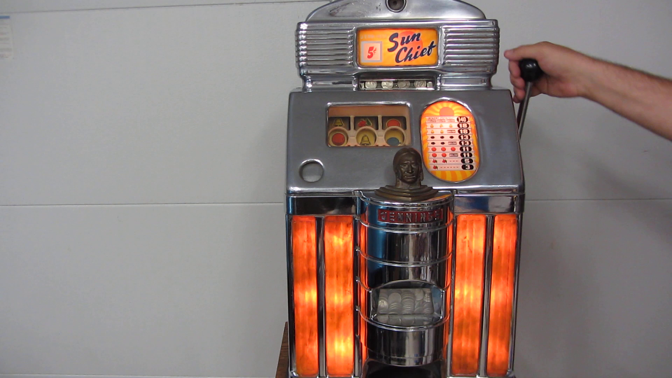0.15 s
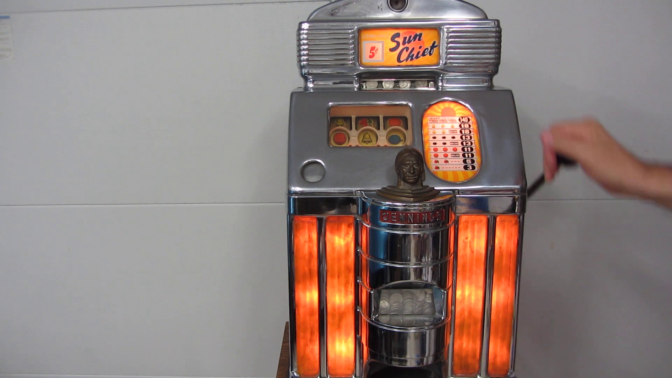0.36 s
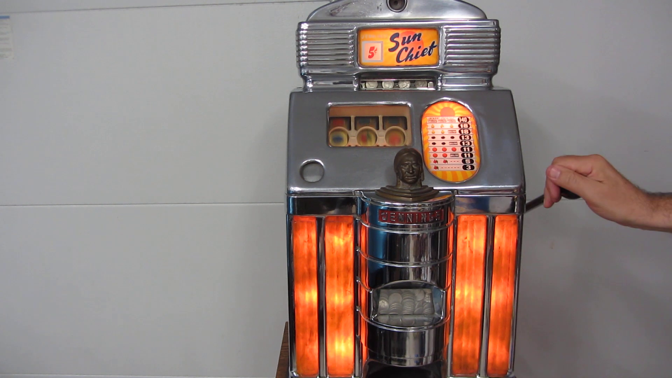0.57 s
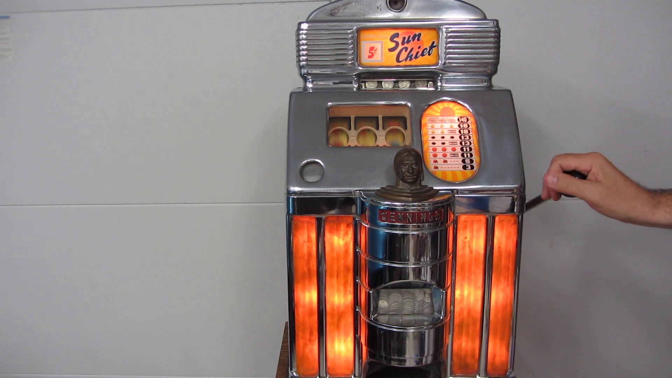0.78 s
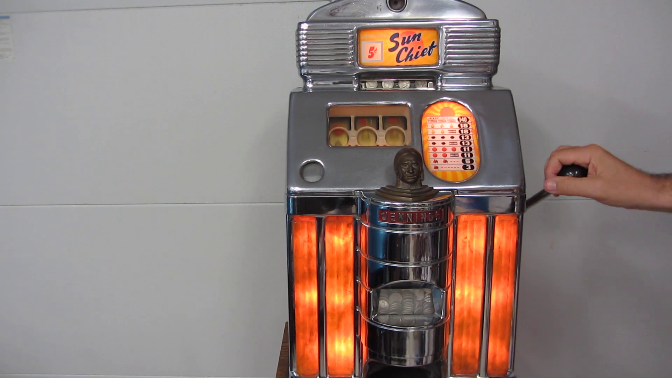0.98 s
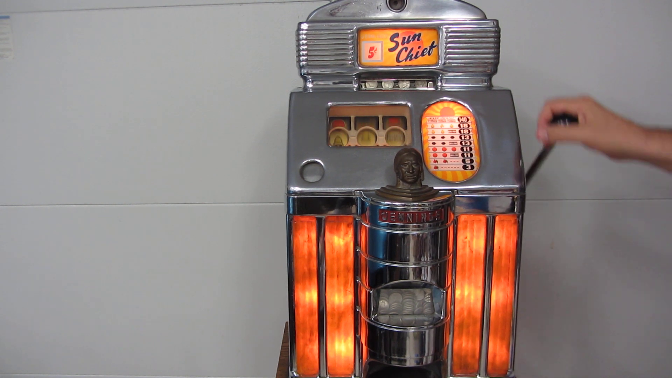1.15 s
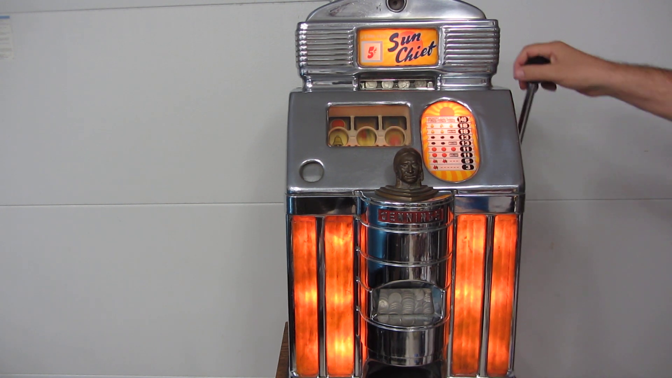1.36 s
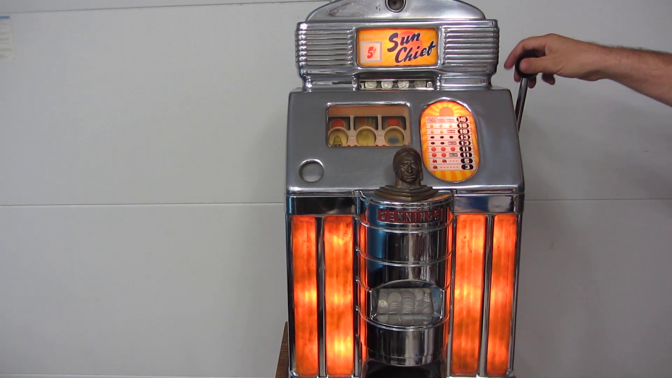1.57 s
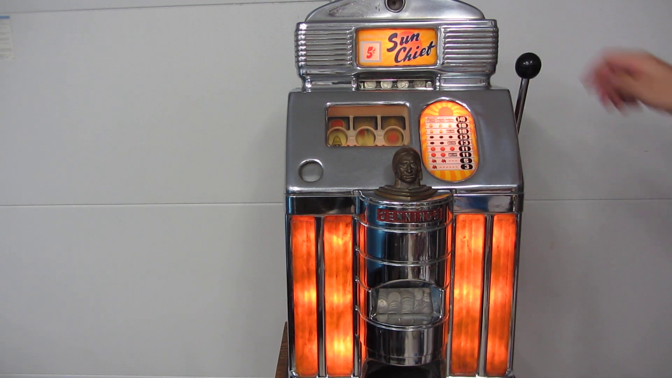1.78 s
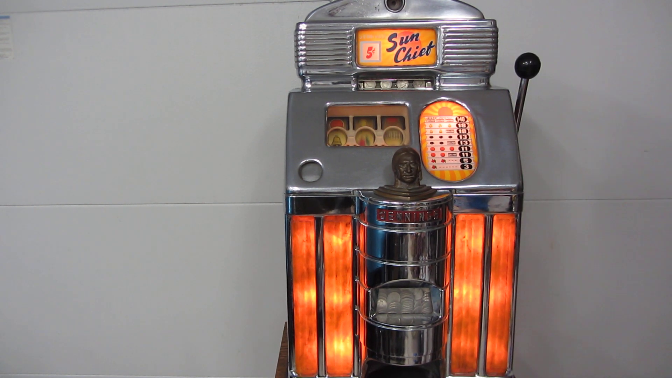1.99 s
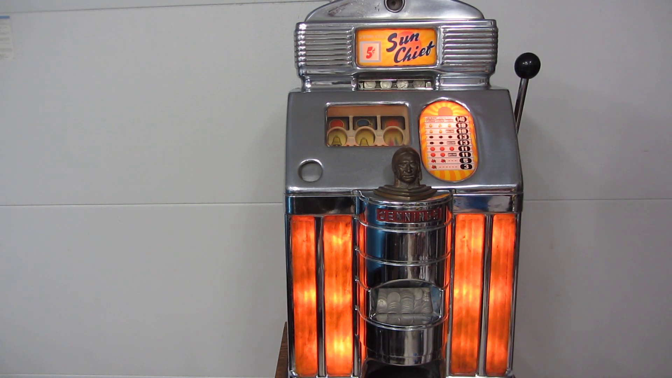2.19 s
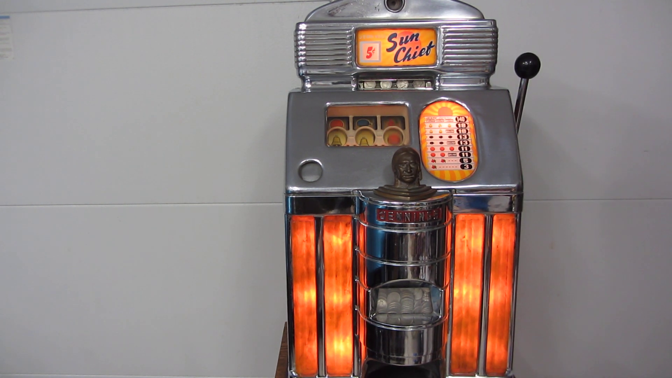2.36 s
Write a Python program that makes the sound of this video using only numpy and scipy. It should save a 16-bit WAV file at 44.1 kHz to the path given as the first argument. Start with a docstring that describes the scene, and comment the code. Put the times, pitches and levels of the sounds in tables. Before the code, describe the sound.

Close up in a small quiet room, a slot machine lever crashes down with rattling linkage and low booms, eases back with lighter clunks and ticks, and ends in crisp clicks over faint hum.

```python
"""Small room, close by: the handle of a mechanical slot machine is pulled down and let back up.
The linkage clatters and the ratchet ticks: dying noise bursts that drive cabinet panel resonances.
Levers, teeth, catches, a pawl, a spring and a zing ring as clusters of beating partials.
Low sine thumps boom in the cabinet; a diffuse tail, room noise and a faint mains hum lie around it."""
import sys
import numpy as np
from scipy import signal
from scipy.io import wavfile

SR = 44100
rng = np.random.default_rng(int(sys.argv[2]) if len(sys.argv) > 2 else 0)


def unload_audio(sound):
    """Save the sound as a 16-bit wav file, at the path given as the first command line argument."""
    columns = np.transpose(np.atleast_2d(sound))
    # keep every value between -1 and 1, then stretch to whole-number steps
    steps = np.round(np.clip(columns, -1, 1) * 32767)
    wavfile.write(sys.argv[1], SR, steps.astype(np.int16))


N = 110250
TIME_S = np.arange(N) / SR
EDGES_HZ = 31.25 * 2 ** np.arange(0, 9.1, .5)  # half-octave bands
CENTRES_HZ = np.sqrt(EDGES_HZ[1:] * EDGES_HZ[:-1])
EARS = np.array([[1], [-1]])  # left, right

# room noise: band_hz, level_db (per half-octave band)
FLOOR = [(40, -80), (80, -62.5), (140, -54), (220, -63.5), (1200, -64), (2200, -61.5), (3300, -72.5),
         (7000, -72), (10000, -86), (14000, -88)]
# stereo likeness: band_hz, left_right_correlation (clipped in use)
LIKENESS = [(40, -2.1), (130, 0.99), (4000, 0.66), (8000, 0.45), (13000, -0.57)]
# linkage blows: start_s, low_db, mid_db, high_db, top_db, t60_s
BLOWS = [(0.154, -45, -43, -48.5, -76, 0.24), (0.202, -20, -24, -28, -32, 0.37),
         (0.251, -26, -27.5, -28.5, -20, 0.46), (0.2695, -14, -17.5, -17.5, -43, 0.31),
         (0.289, -17, -19.5, -18, -16, 0.17), (0.314, -37, -28, -23.5, -18, 0.59),
         (0.359, -18, -20.5, -12.5, -19.5, 0.11), (0.396, -21.5, -23, -23, -20, 0.51),
         (0.439, -18, -13.5, -19, -36, 0.13), (0.4693, -18, -17.5, -17, -12.5, 0.12),
         (0.49, -18.5, -19.5, -22, -17.5, 0.13), (0.555, -20.5, -35, -33.5, -28, 0.37),
         (0.579, -23, -23, -26, -26.5, 0.075), (0.8344, -37.5, -39, -45.5, -58, 0.3),
         (0.99, -28.5, -36, -25.5, -45, 0.16), (1.066, -25.5, -26, -29, -34.5, 0.23),
         (1.235, -32, -34, -38, -51, 0.39), (1.3632, -21, -18, -18, -20.5, 0.19),
         (1.405, -30, -26, -35, -25, 0.15), (1.9507, -31.5, -21, -13.5, -17, 0.028),
         (2.083, -38, -37, -20.5, -18, 0.08), (2.092, -25, -27, -21.5, -49, 0.15),
         (2.165, -29, -29, -29.5, -29, 0.16)]
# centres of those four level columns: band_hz
BLOW_BANDS_HZ = [400, 1200, 3600, 10500]
# blow spectrum, added to the band levels: band_hz, level_db
BLOW_SHAPE = [(40, -70), (75, -30), (148, -14.5), (215, -12), (420, -7.5), (6800, -6.5), (9600, -11),
              (13500, -18)]
# ratchet ticks: start_s, level_db, pitch_hz
TICKS = [(0.238, -28, 4650), (.833, -47, 2490), (1.184, -40.5, 2170), (1.319, -45, 3430),
         (1.4672, -25.5, 2282), (1.499, -30, 1960), (1.5363, -29.5, 2320), (1.582, -38, 2570),
         (1.728, -34, 3820), (1.7608, -36.5, 2120), (1.813, -31.5, 2320), (1.851, -32, 5470),
         (1.919, -29, 4510), (1.928, -34, 4680), (1.959, -22.5, 3326), (2.0065, -32, 7160)]
# tick noise, relative to the tick level: band_hz, level_db (per half-octave band)
TICK_SPECTRUM = [(100, -59), (400, -27.5), (1000, -18), (2200, -9.5), (4500, -10), (8500, -5.5),
                 (13500, -34)]
# cabinet and panel resonances: mode_hz, gain_db, t60_s
PANELS = [(157.8, 3, 0.22), (197.7, 7.5, 1), (495.5, 1, 0.31), (1818, -4.5, 0.15), (1950, 4.5, 0.46),
          (2190, 4, .3)]
# room decay: band_hz, t60_s
ROOM_T60 = [(120, 0.38), (400, 0.86), (1200, 0.4), (3500, 0.41), (8000, 0.46), (14000, 0.16)]
# room tail gain: band_hz, gain_db
ROOM_GAIN = [(120, -6), (400, -5.5), (1200, -4.5), (14000, -10)]
# levers clanking under the hardest blows: start_s, level_db, pitch_hz
CLANKS = [(.2035, -16.5, 838), (.25, -21, 4510), (.2715, -12.5, 629), (.29, -23, 4390), (.3615, -16, 3054),
          (.4385, -9.5, 2016), (.4715, -13.5, 2285), (1.365, -16.5, 4030)]
# zing hits: start_s, level_db
ZING_HITS = [(.207, -35.5)]
# zing mode: mode_hz, level_db, t60_s
ZING_MODES = [(13950, 0.0067, 0.7)]
# cabinet thumps: start_s, level_db, pitch_hz
THUMPS = [(0.208, -9, 139), (.275, -13, 143.3), (.305, -11, 143.3), (.438, -8.5, 151.2),
          (0.493, -4.5, 144.3), (0.562, -11.5, 158.3), (1.069, -12.5, 137), (1.239, -12, 145),
          (1.366, -10, 160.2), (1.441, -14.5, 138), (1.726, -29, 143), (2.097, -10, 140.3),
          (2.181, -14, 137.3)]
# linkage spring hits: start_s, level_db
SPRING_HITS = [(.472, -41.5)]
# spring modes: mode_hz, level_db, t60_s
SPRING_MODES = [(3310, -12.5, 1.4), (4080, -11, 1.5), (6380, -10, 1.77)]
# catch snaps: start_s, level_db
CATCH_HITS = [(.994, -26), (1.067, -29.5), (2.0845, -20.5), (2.094, -23), (2.164, -29)]
# catch modes: mode_hz, level_db, t60_s
CATCH_MODES = [(1480, -3.5, 0.11), (2976, 1.5, 0.11), (3205, 8, 0.03), (6070, 0, .045), (8100, 1.5, 0.047)]
# spring-loaded pawl drops: start_s, level_db
PAWL_HITS = [(1.9515, -27), (1.962, -25.5)]
# pawl modes: mode_hz, level_db, t60_s
PAWL_MODES = [(834, -3.5, 0.18), (1380, -25, 0.3), (2167, -5.5, 0.16), (6960, -1, 0.052)]

HUM_HZ, HUM_RMS_DB = 120, -57.5
ATTACK_S, TICK_T60_S = 0.00051, 0.13
CRACK_DB, CRACK_S = -11, 0.0087  # added to the burst at its start
GRAIN_DB, GRAIN_S = 1, 0.00063  # random level spread, spacing
BUILD_CYCLES = 2.1  # time constant of band power
PAN_DB = -0.44  # left by this, right by its opposite
RING_T60_S, TICK_RING_DB = 0.065, -1  # ring level relative to the tick
OVERTONE_RATIO, OVERTONE_DB = 1.3, -2.5  # second mode, relative to the pitch
BOOM_SWELL_S, BOOM_T60_S = 0.015, 0.16
SPRING_CUT_S = 0.76
CUTOFF_HZ = 16000


def from_db(db):
    """Decibels to amplitude."""
    return 10 ** (np.asarray(db) / 20)


def rms_one(x):
    """Scale to unit RMS."""
    return x / np.sqrt(np.mean(x ** 2) + 1e-20)


def at_hz(points, hz):
    """Read a table on a log-frequency axis."""
    table_hz, value = np.transpose(points)
    return np.interp(np.log(hz), np.log(table_hz), value)


def dying(age_s, t60_s):
    """Exponential decay: 60 dB in t60_s."""
    return np.exp(-np.log(1000) * age_s / t60_s)


def banded(envelopes, pan_db=0):
    """Stereo noise in half-octave bands, each shaped by its envelope before its filter."""
    white = rng.standard_normal((2, 2, envelopes.shape[1]))
    out = 0
    for k, hz in enumerate(CENTRES_HZ):
        sos = signal.butter(2, EDGES_HZ[k:k + 2], "band", fs=SR, output="sos")
        band = signal.sosfilt(sos, white[k % 2] * envelopes[k] + 1e-18)
        mid, side = band * np.sqrt(SR / 2 / (EDGES_HZ[k + 1] - EDGES_HZ[k]))
        alike = np.clip(at_hz(LIKENESS, hz), -.99, .99)
        stereo = np.sqrt((1 + alike) / 2) * mid + np.sqrt((1 - alike) / 2) * side * EARS
        out = out + stereo * from_db(pan_db * EARS)
    return out


def background():
    """Room noise, steady in each band, and mains hum, a sine."""
    air = banded(from_db(at_hz(FLOOR, CENTRES_HZ))[:, None] * np.ones(N))
    hum = from_db(HUM_RMS_DB) * np.sqrt(2) * np.sin(2 * np.pi * HUM_HZ * TIME_S)
    return air + hum


def burst(start_s, t60_s):
    """Sharp attack, a short crack while the parts chatter, then free decay."""
    age_s = np.maximum(TIME_S - start_s, 0)
    crack = 1 + from_db(CRACK_DB) * np.exp(-(age_s / CRACK_S) ** 2)
    return (1 - np.exp(-age_s / ATTACK_S)) * dying(age_s, t60_s) * crack


def linkage():
    """Blows and ticks: dying flurries of tiny metal contacts; low bands build up slowest."""
    gains, shapes = [], []
    for start_s, *levels_db, t60_s in BLOWS:
        band_db = np.interp(np.log(CENTRES_HZ), np.log(BLOW_BANDS_HZ), levels_db)
        gains.append(from_db(band_db + at_hz(BLOW_SHAPE, CENTRES_HZ)))
        shapes.append(burst(start_s, t60_s))
    for start_s, level_db, _ in TICKS:
        gains.append(from_db(level_db + at_hz(TICK_SPECTRUM, CENTRES_HZ)))
        shapes.append(burst(start_s, TICK_T60_S))
    powers = np.square(gains).T @ np.square(shapes)
    keep = np.exp(-CENTRES_HZ / (BUILD_CYCLES * SR))
    built = [signal.lfilter([1 - r], [1, -r], power + 1e-18) for r, power in zip(keep, powers)]
    wobble = np.interp(TIME_S / GRAIN_S, np.arange(N), rng.standard_normal(N))
    grain = rms_one(from_db(GRAIN_DB * wobble))
    return banded(np.sqrt(built) * grain, PAN_DB)


def resonance(x, hz, t60_s):
    """Two-pole resonance with unit gain at its peak."""
    r = dying(1 / SR, t60_s)
    poles = [1, -2 * r * np.cos(2 * np.pi * hz / SR), r * r]
    return signal.lfilter(np.array([1, 0, -1]) * (1 - r * r) / 2, poles, x)


def cabinet(x):
    """The panels ring along with the blows and ticks that drive them."""
    return sum(from_db(gain_db) * resonance(x, hz, t60_s) for hz, gain_db, t60_s in PANELS)


def room(x):
    """Diffuse tail: convolution with decaying noise, decay and gain set per band."""
    age_s = TIME_S[:SR]
    onset = 1 - np.exp(-age_s / 0.0034)
    tails = np.array([dying(age_s, at_hz(ROOM_T60, hz)) * onset for hz in CENTRES_HZ])
    unit = np.sqrt(np.diff(EDGES_HZ) * 2 / SR / np.sum(tails ** 2, axis=1))
    gains = from_db(at_hz(ROOM_GAIN, CENTRES_HZ)) * unit
    return signal.fftconvolve(x, banded(tails * gains[:, None]), axes=1)[:, :N]


def struck(hits, modes, split, count=3):
    """Small steel part: each hit rings all modes, each a cluster of close partials that beat."""
    out = np.zeros((2, N + SR))
    for start_s, level_db in hits:
        start = int(start_s * SR)
        for hz, mode_db, t60_s in modes:
            age_s = TIME_S[:SR][:int(1.5 * t60_s * SR)]
            offsets = np.linspace(-1, 1, count) + rng.uniform(-1.11, 1, count)
            partials_hz = hz * (1 + split * offsets)
            cycles = partials_hz[:, None] * age_s + rng.random((count, 1))
            ring = np.exp(2j * np.pi * cycles).sum(0) / np.sqrt(count)
            # phase offset between the ears sets their correlation
            apart = rng.choice([-1, 1]) * np.arccos(np.clip(at_hz(LIKENESS, hz), -1, 1)) / 2
            envelope = (1 - np.exp(-age_s / ATTACK_S)) * dying(age_s, t60_s)
            envelope = from_db(level_db + mode_db) * envelope
            out[:, start:start + len(age_s)] += envelope * np.real(ring * np.exp(1j * apart * EARS))
    return out[:, :N]


def levers_and_teeth():
    """Levers and ratchet teeth ring in two modes, each at the pitch of its own size."""
    out = np.zeros((2, N))
    teeth = [(start_s, level_db + TICK_RING_DB, hz) for start_s, level_db, hz in TICKS]
    for start_s, level_db, hz in CLANKS + teeth:
        modes = [(hz, 0, RING_T60_S), (hz * OVERTONE_RATIO, OVERTONE_DB, RING_T60_S)]
        out += struck([(start_s, level_db)], modes, split=0.0305)
    return out


def zing():
    """Thin, very high ring as the linkage trips: one cluster of partials."""
    return struck(ZING_HITS, ZING_MODES, split=.005)


def boom():
    """Heavy jolts swing the whole cabinet: low sine thumps that swell and die."""
    out = np.zeros(N)
    for start_s, level_db, hz in THUMPS:
        age_s = np.maximum(TIME_S - start_s, 0)
        envelope = (1 - np.exp(-age_s / BOOM_SWELL_S)) ** 2 * dying(age_s, BOOM_T60_S)
        out += from_db(level_db) * envelope * np.sin(2 * np.pi * hz * age_s)
    return out


def spring():
    """Linkage spring sings in long modes, then is cut off at a set time."""
    return struck(SPRING_HITS, SPRING_MODES, split=0.00284) * (TIME_S < SPRING_CUT_S)


def catch():
    """Catch snaps in: short modes of six widely split partials."""
    return struck(CATCH_HITS, CATCH_MODES, split=0.0388, count=6)


def pawl():
    """Spring-loaded pawl drops: short, split modes."""
    return struck(PAWL_HITS, PAWL_MODES, split=0.025)


def scene():
    """Machine in its room; blows, ticks and panels slightly to the right."""
    works = linkage()
    machine = works + cabinet(works) + levers_and_teeth() + zing() + boom()
    machine = machine + spring() + catch() + pawl()
    return background() + machine + room(machine)


def record(dry):
    """Soft saturation rounds the highest peaks; a steep low-pass cuts the top."""
    lowpass = signal.ellip(10, .2, 70, CUTOFF_HZ, fs=SR, output="sos")
    return signal.sosfilt(lowpass, np.tanh(dry))


dry = scene()
out = record(dry)
unload_audio(out)
```